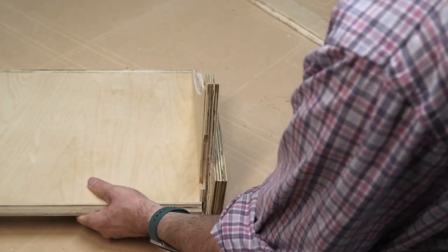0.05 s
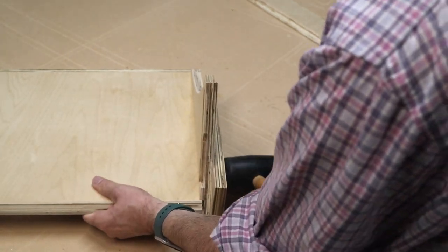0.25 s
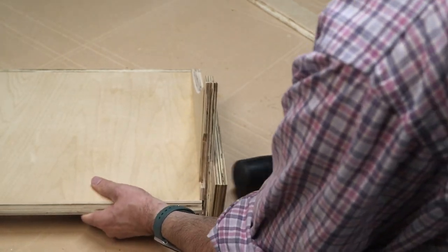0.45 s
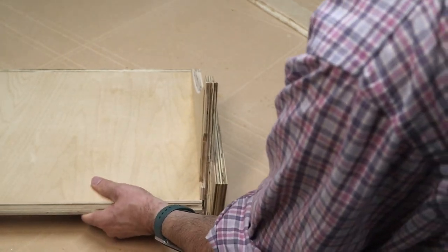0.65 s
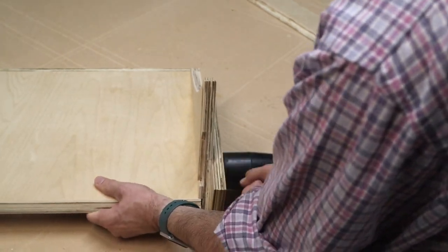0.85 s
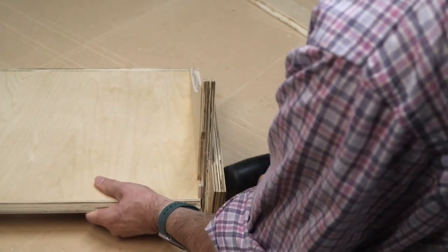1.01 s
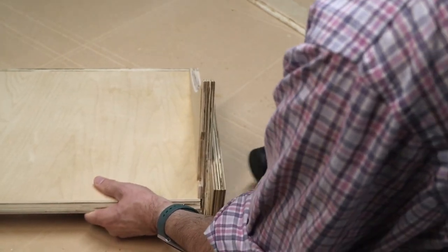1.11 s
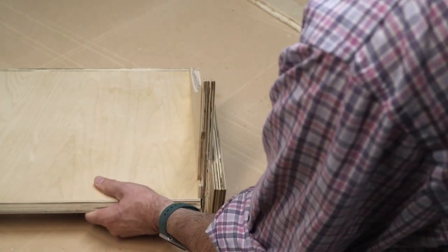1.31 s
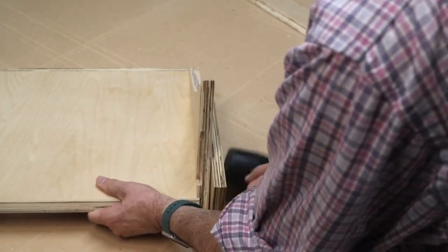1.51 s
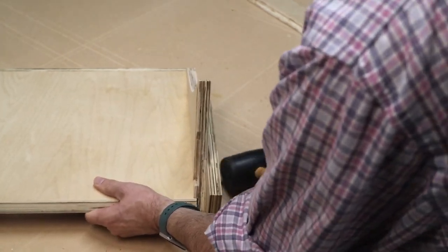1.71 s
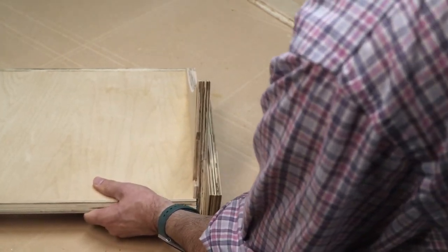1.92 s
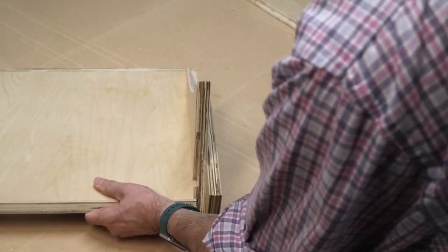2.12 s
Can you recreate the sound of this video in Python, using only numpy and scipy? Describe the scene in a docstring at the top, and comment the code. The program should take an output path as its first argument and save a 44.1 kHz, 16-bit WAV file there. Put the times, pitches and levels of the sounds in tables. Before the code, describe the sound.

Three mallet blows knock a plywood panel, evenly spaced, each echoing through a quiet workshop

```python
"""Quiet workshop air and soft bumps as a hand shifts a plywood panel, two before and one between the first
two of three evenly timed mallet blows. A faint rush and a scuff lead into each blow. Noise bursts make
the cracks and dying sines the wood; the first blow thuds fullest and is followed at once by the joint
knocking home. Each knock reflects off walls into a diffuse echo of shaped noise and standing waves. The
recorder's limiter ducks at every blow and recovers about as fast as the room dies, so the echo seems to hang."""
import sys
import numpy as np
from scipy import signal
from scipy.fft import rfft, irfft
from scipy.io import wavfile
from scipy.ndimage import uniform_filter1d

SR = 44100
rng = np.random.default_rng(int(sys.argv[2]) if len(sys.argv) > 2 else 0)


def output_pcm(signal):
    """Save a mono or channel-first signal as 16-bit PCM at the path in sys.argv[1].

    Samples are clipped to [-1, 1] before scaling.
    """
    pcm = np.clip(np.atleast_2d(signal).T, -1, 1) * 32767
    wavfile.write(sys.argv[1], SR, np.round(pcm).astype(np.int16))


N = 94815

# mallet blows: t/s, strength/dB, crack level/dB, crack t60/s, thud level/dB, ring level/dB,
# echo level/dB, echo treble/dB
BLOW_EVENTS = [(0.239, 3.5, 0.5, 0.018, -0.5, -5, -1.17, 2.5),
               (0.9223, 1.5, -3, .013, -16.5, 0, -1.57, -2.5), (1.6190, -3.5, -1, 0.0082, -4.5, 6.5, 4, -2)]
# left-right likeness of diffuse sound: f/Hz, correlation (1 same, -1 opposite)
LIKENESS = [(40, 0.99), (180, 1), (400, 0.92), (800, 0.47), (1500, -0.07), (2600, -.3), (4000, -0.5),
            (6500, -0.74), (11000, -0.73)]
# colour of the diffuse echo: f/Hz, relative level per Hz/dB
ECHO_COLOUR = [(30, -37), (60, -18.5), (120, -21), (180, -9), (270, -3), (362, -6), (405, -1), (460, -8.5),
               (700, -4.5), (920, -3), (1130, -3.5), (1460, -3.5), (1980, -6.5), (2500, -12), (3750, -11.5),
               (4900, -15.5), (5900, -19.5), (10400, -26), (13200, -52.5)]
# how long the room rings in each band: f/Hz, t60/s
ROOM_DECAY = [(100, 0.65), (260, 0.6), (700, 0.65), (1600, 0.7), (4500, .7), (8000, 0.58), (13000, 0.46)]


def amp(db):
    """Decibels to gain."""
    return 10 ** (np.asarray(db) / 20)


def read(points, hz):
    """Reads a table over frequency on a log-frequency axis."""
    f, value = np.transpose(points)
    return np.interp(np.log(hz + 1), np.log(f), value)


def add(mix, s, sound):
    """Mixes a stereo sound in at time s, cut off at the end of the mix."""
    part = mix[:, round(s * SR):][:, :sound.shape[1]]
    part += sound[:, :part.shape[1]]


def cut(x, order, hz, kind="low"):
    """Butterworth low-pass or high-pass filter."""
    return signal.sosfilt(signal.butter(order, hz, kind, fs=SR, output="sos"), x)


def noise(colour, likeness, size):
    """Stereo noise of rms 1 with a given colour, its mid and side balanced for left-right likeness."""
    hz = np.fft.rfftfreq(size, 1 / SR)
    mid, side = np.exp(2j * np.pi * rng.random((2, len(hz))))
    same = read(likeness, hz)
    mid = mid * np.sqrt(1 + same)
    side = side * np.sqrt(1 - same)
    stereo = np.array([mid + side, mid - side])
    x = irfft(stereo * amp(read(colour, hz)), size)
    return x / x.std()


def modes(table, t, rise_s):
    """Dying sines; the lower ones arrive and swell later, as bending waves do."""
    travel_s = 0.00289  # at 1 kHz, like rise_s
    out = 0
    for k, (hz, db, t60) in enumerate(table):
        slow = np.sqrt(1000 / hz)  # bending waves are slower at lower pitch
        age = np.maximum(t - travel_s * slow, 0)
        swell = 1 - np.exp(-age / (rise_s * slow))
        polarity = (-1) ** k
        out = out + polarity * amp(db - 60 * age / t60) * swell * np.sin(2 * np.pi * hz * age)
    return out


def air():
    """The quiet air of the workshop: steady noise, strongest in the bass."""
    # f/Hz, relative level per Hz/dB
    air_colour = [(25, -1.5), (70, -5), (140, -12), (300, -13), (600, -17), (2000, -17.5), (5000, -24.5),
                  (10000, -34.5), (16000, -47.5)]
    level_db = -73.5
    return amp(level_db) * noise(air_colour, LIKENESS, size=N)


def bumps():
    """The hand shifts the panel: it rocks softly on the bench as dying sines, with a little scuffing noise."""
    # t/s, level/dB, scuff level/dB
    bump_events = [(0.038, -50, -5.5), (0.07, -59, -13), (0.582, -52.5, -4)]
    # rocking of the panel: f/Hz, level/dB, t60/s
    rock_modes = [(186, 2, 0.13), (226, -5.5, 0.15), (540, -13.5, 0.16)]
    # scuffing: f/Hz, relative level per Hz/dB
    bump_colour = [(40, -22), (100, -5.5), (280, -4.5), (480, -21), (2500, -29), (10000, -43),
                   (15000, -59.5)]
    rock_rise_s, scuff_rise_s, scuff_t60_s = 0.0033, 0.0012, 0.42
    out = np.zeros((2, N))
    t = np.arange(SR // 3) / SR
    for s, db, scuff_db in bump_events:
        rise = np.minimum(t / scuff_rise_s, 1)
        decay = amp(scuff_db - 60 * t / scuff_t60_s)
        scuff = noise(bump_colour, LIKENESS, size=len(t)) * rise * decay
        add(out, s, amp(db) * (modes(rock_modes, t, rock_rise_s) + scuff))
    return out


def rushes():
    """A faint rush of noise swells exponentially just ahead of each blow and stops at its onset."""
    # f/Hz, relative level per Hz/dB
    rush_colour = [(50, -19.5), (230, 5), (450, -6), (1650, -4), (5000, -24.5), (10000, -31.5),
                   (15000, -69.5)]
    level_db, swell_db_per_s = -51.5, 389
    out = np.zeros((2, N))
    ahead = np.arange(SR // 10)[::-1] / SR  # seconds left before the blow
    for s, db, *_ in BLOW_EVENTS:
        swell = amp(level_db + db - swell_db_per_s * ahead)
        add(out, s - ahead[0], noise(rush_colour, LIKENESS, size=len(ahead)) * swell)
    return out


def scuffs():
    """A short, faint scuff of midrange noise rises into each blow."""
    # t/s, level/dB
    scuff_events = [(0.212, -50.5), (.888, -53.5), (1.593, -60)]
    # f/Hz, relative level per Hz/dB
    scuff_colour = [(1000, -13.5), (1600, -4), (2300, -14), (12000, -50)]
    rise_s = 0.008
    out = np.zeros((2, N))
    t = np.arange(SR // 30) / SR
    for s, db in scuff_events:
        rise = 1 - np.exp(-t / rise_s)
        add(out, s, noise(scuff_colour, LIKENESS, size=len(t)) * amp(db) * rise)
    return out


def panel(crack_db, crack_t60, thud_db, ring_db):
    """A short noise crack in the centre, then the modes of the panel, which lies to the left."""
    # bending of the whole panel: f/Hz, level/dB, t60/s
    thud_modes = [(181.7, -23.5, 0.28), (214.5, -18.5, 0.29), (267.2, -10, 0.1), (327.5, -22, 0.056),
                  (371.7, -33, 0.044), (410, -12, 0.13), (520, -17.5, 0.078), (673.7, -12, 0.18),
                  (752, -8.5, 0.033), (853, -13, 0.038), (1022, -12, 0.069)]
    # ring of the struck edge: f/Hz, level/dB, t60/s
    ring_modes = [(680, -17.5, 0.066), (863, -25, 0.024), (1142, -20.5, 0.14), (1241, -16, 0.033),
                  (1491, -6.5, 0.035), (1729, -14.5, 0.035), (1880, -8, 0.022), (1998, -22.5, 0.089),
                  (2667, -5.5, 0.012), (3250, -13, 0.023), (3990, -18.5, .018), (6660, -16.5, 0.0098),
                  (10470, -28.5, .014)]
    # crack: f/Hz, relative level per Hz/dB
    crack_colour = [(100, -10.5), (400, 3), (1600, 4.5), (2600, 2.5), (4100, 4.5), (5600, -3.5),
                    (7500, -16.5), (10700, -10), (12000, -24.5), (16000, -46.5)]
    thud_rise_s, ring_rise_s = 0.0031, 0.00085
    right_db, right_lag_s = -2.5, 0.00011
    crack_trim_db, crack_likeness = -2, 0.69
    low_cut_hz, high_cut_hz = 115, 11500
    t = np.arange(SR // 3) / SR

    thud = amp(thud_db) * modes(thud_modes, t, thud_rise_s)
    ring = amp(ring_db) * modes(ring_modes, t, ring_rise_s)
    wood = thud + ring
    right = amp(right_db) * np.interp(t - right_lag_s, t, wood, left=0)
    out = np.array([wood, right])

    burst = noise(crack_colour, [(1000, crack_likeness)], size=2048)
    decay = amp(crack_trim_db + crack_db - 60 * t[:burst.shape[1]] / crack_t60)
    add(out, 0, burst * decay)
    return cut(cut(out, 6, high_cut_hz), 3, low_cut_hz, "high")


def standing(t):
    """Standing waves build up and die with the room; the higher ones differ more between left and right."""
    # f/Hz, level/dB
    standing_modes = [(214, -44), (269, -35.5), (323, -34.5), (522, -38), (673, -45), (724, -38.5),
                      (853, -37.5)]
    rise_s = 0.0053
    out = 0
    for hz, db in standing_modes:
        apart = np.arccos(read(LIKENESS, hz)) * rng.choice([-1, 1])  # phase between the channels
        phase = 2 * np.pi * rng.random() + np.array([[0], [apart]])
        decay = amp(db - 60 * t / read(ROOM_DECAY, hz))
        out = out + decay * np.sin(2 * np.pi * hz * t + phase)
    return out * (1 - np.exp(-t / rise_s))


def workshop(paths, treble_db):
    """The echo of one knock: partly shared paths, in uneven clumps, each band dying at its own speed."""
    # far-wall reflections come in clusters: time after the knock t/s, echo level/dB
    cluster_levels = [(.035, 2), (.075, -1.5), (.105, 0.95), (.135, -1.2), (.172, 0.2), (.21, 0.5),
                      (.3, -0.02)]
    level_db, rise_s, treble_hz = -19.5, 0.00071, 2620
    shared, patch_db = 0.63, 1.5  # part of the power common to all knocks; spread of the clumps
    size = paths.shape[1]
    age = np.arange(size) / SR

    fresh = noise(ECHO_COLOUR, LIKENESS, size=size)
    diffuse = np.sqrt(shared) * paths + np.sqrt(1 - shared) * fresh
    hz, t, z = signal.stft(diffuse, SR, nperseg=512)

    shelf_db = treble_db * hz ** 4 / (hz ** 4 + treble_hz ** 4)
    patches = rng.standard_normal(z.shape[1:])
    patches = uniform_filter1d(patches, size=9, axis=0)  # over frequency
    patches = uniform_filter1d(patches, size=3, axis=1)  # over time
    clumps_db = patch_db * patches / patches.std()
    decay_db = -60 * t / read(ROOM_DECAY, hz)[:, None]
    clusters_db = np.interp(t, *np.transpose(cluster_levels))
    z = z * amp(clusters_db + shelf_db[:, None] + clumps_db + decay_db)

    tail = signal.istft(z, SR, nperseg=512)[1][:, :size]
    rise = 1 - np.exp(-age / rise_s)
    return amp(level_db) * tail * rise + standing(age)


def ripple(x):
    """Colours the echo with the countless narrow resonances of panel and room, the same for every blow."""
    depth_db, from_hz = 1.4, 900
    hz = np.fft.rfftfreq(4096, 1 / SR)
    bends = rng.standard_normal(len(hz))
    bends = uniform_filter1d(uniform_filter1d(bends, size=3), size=2)
    bends_db = depth_db * bends / bends.std() * hz / (hz + from_hz)
    # folding the cepstrum forward in time keeps the filter from ringing ahead of the sound
    cepstrum = irfft(np.log(amp(bends_db)))
    folded = 2 * cepstrum[:len(cepstrum) // 2]
    response = irfft(np.exp(rfft(folded, len(cepstrum))))
    return signal.fftconvolve(x, response[None], axes=1)[:, :N]


def knocks():
    """Every knock: direct sound, dull reflections from alternate sides, and the room's echo."""
    # the joint knocks home: t/s, strength/dB, crack level/dB, crack t60/s, thud level/dB, ring level/dB,
    # echo level/dB, echo treble/dB
    seating_events = [(0.2648, -2, -2.5, 0.019, -2, -0.5, -11, 4.5)]
    # single reflections: delay t/s, level/dB, dulled above f/Hz
    wall_paths = [(.0125, -15, 3060), (.028, -14, 2600), (.102, -28.5, 2850), (.168, -36, 5900)]
    out, echo = np.zeros((2, 2, N))
    paths = noise(ECHO_COLOUR, LIKENESS, size=SR * 3 // 2)
    events = [*BLOW_EVENTS, *seating_events]
    for s, db, crack_db, crack_t60, thud_db, ring_db, echo_db, treble_db in events:
        direct = amp(db) * panel(crack_db, crack_t60, thud_db, ring_db)
        add(out, s, direct)
        for k, (delay, wall_db, cut_hz) in enumerate(wall_paths):
            dull = cut(direct, 2, cut_hz)
            add(out, s + delay, amp(wall_db) * dull[::(-1) ** k])  # every other one swaps sides
        add(echo, s, amp(db + echo_db) * workshop(paths, treble_db))
    return out + ripple(echo)


def scene():
    """Blows and handling over the quiet air of the workshop."""
    return air() + bumps() + rushes() + scuffs() + knocks()


def smooth(x, seconds):
    """One-pole lag."""
    r = np.exp(-1 / (seconds * SR))
    return signal.lfilter([1 - r], [1, -r], x)


def record(dry):
    """A fast limiter with steady recovery, hard-knee clipping of what slips past it, then the band limit."""
    limit_db, recover_db_per_s = -25, 94
    detect_s, clamp_s = 0.0019, 0.00025
    ceiling = 0.09  # of full scale
    rumble_cut_hz, edge_hz = 60, 15900

    power = (dry ** 2).mean(0)
    level_db = 10 * np.log10(smooth(power, detect_s) + 1e-12)
    fall_db = np.arange(N) / SR * recover_db_per_s
    held_db = np.maximum.accumulate(level_db + fall_db) - fall_db  # peaks fall off at a steady rate
    over_db = np.maximum(held_db - limit_db, 0)
    limited = dry * amp(-smooth(over_db, clamp_s))

    drive = signal.resample_poly(limited / ceiling, 2, 1, axis=1)  # oversampled against aliasing
    knee = drive / (1 + drive ** 16) ** (1 / 16)
    clipped = ceiling * signal.resample_poly(knee, 1, 2, axis=1)
    clipped = cut(clipped, 2, rumble_cut_hz, "high")
    band_limit = signal.firwin(255, edge_hz, window=("kaiser", 9), fs=SR)
    return signal.oaconvolve(clipped, band_limit[None], "same")


dry = scene()
out = record(dry)
output_pcm(out)
```